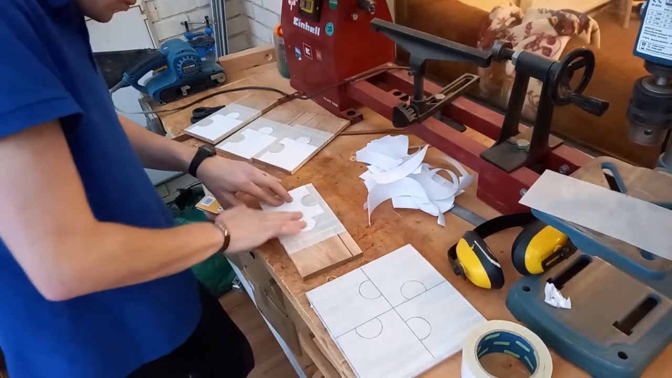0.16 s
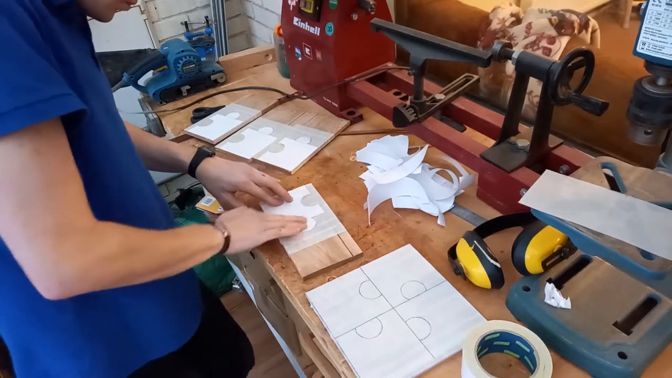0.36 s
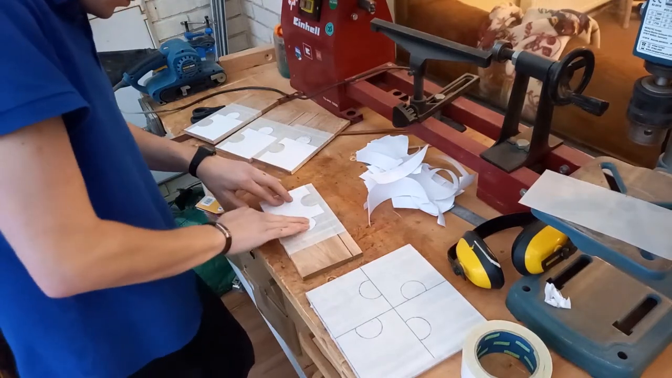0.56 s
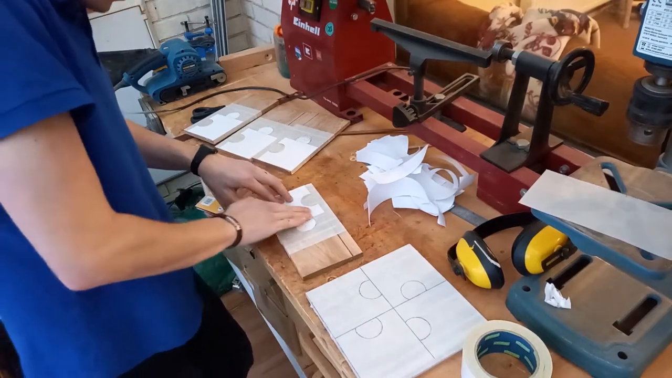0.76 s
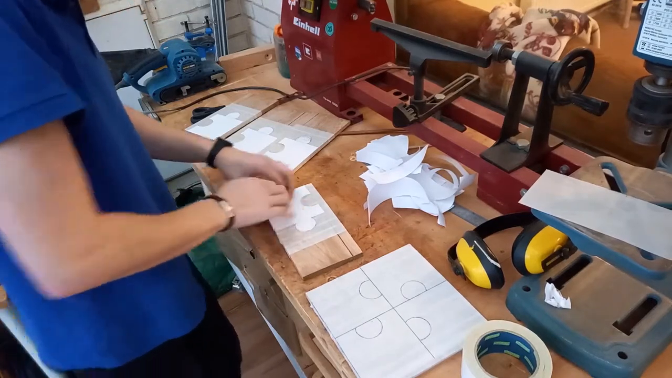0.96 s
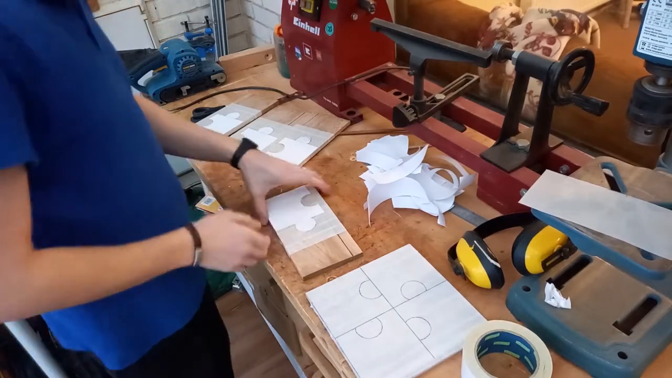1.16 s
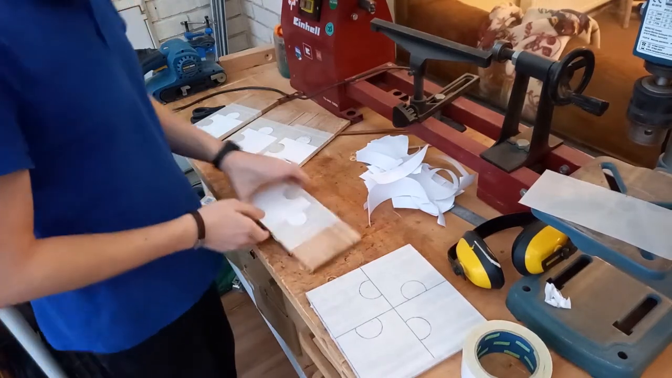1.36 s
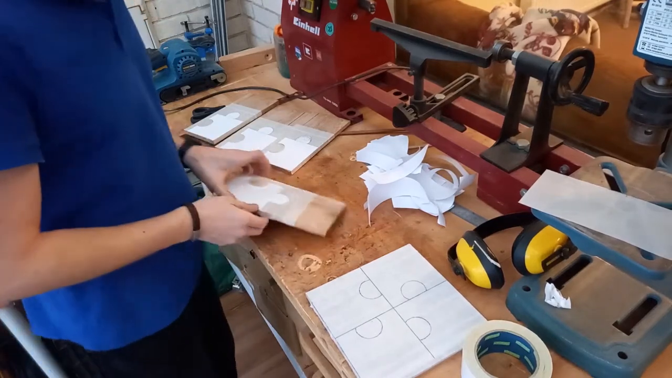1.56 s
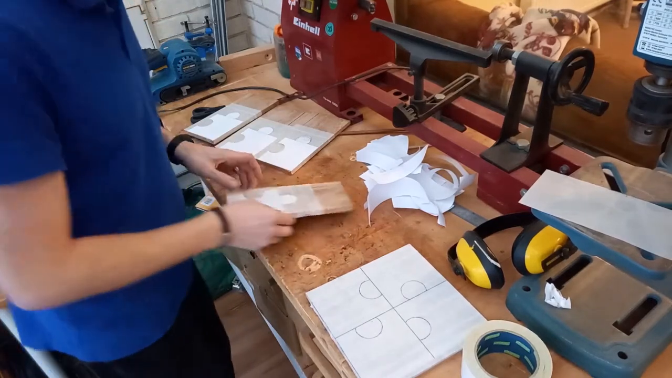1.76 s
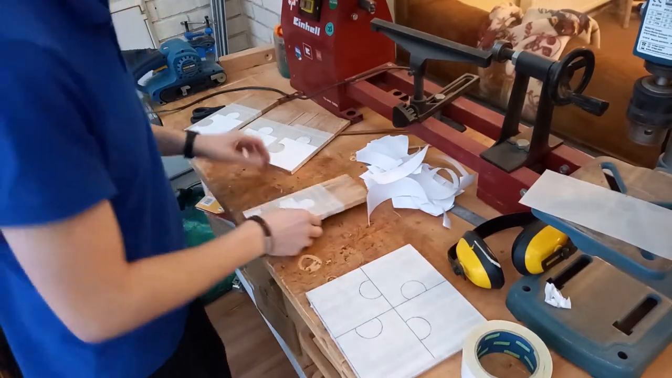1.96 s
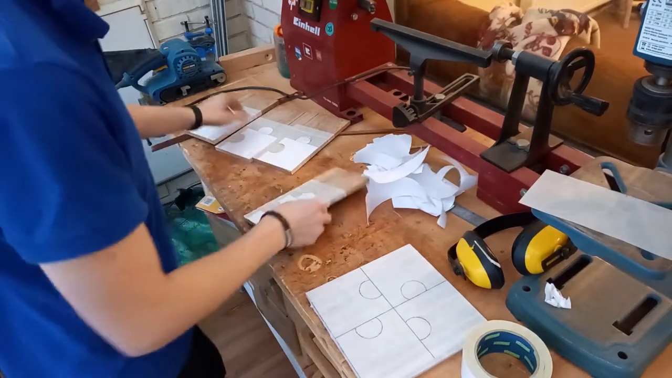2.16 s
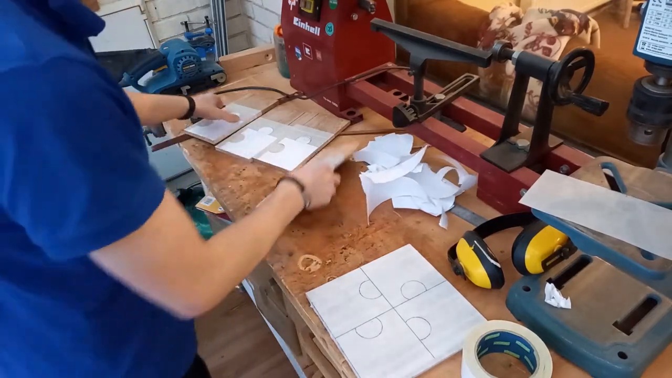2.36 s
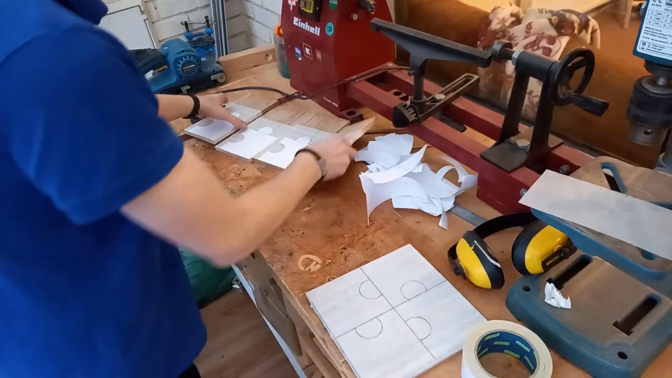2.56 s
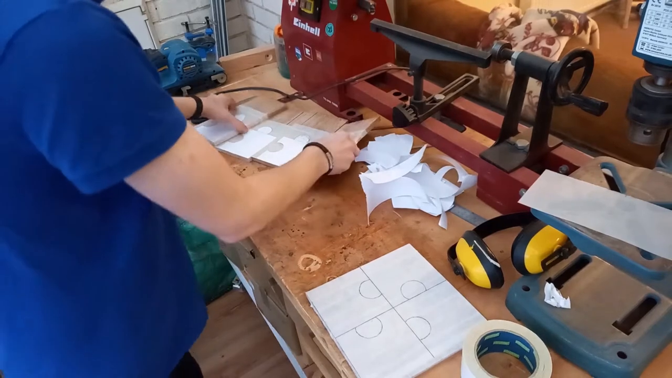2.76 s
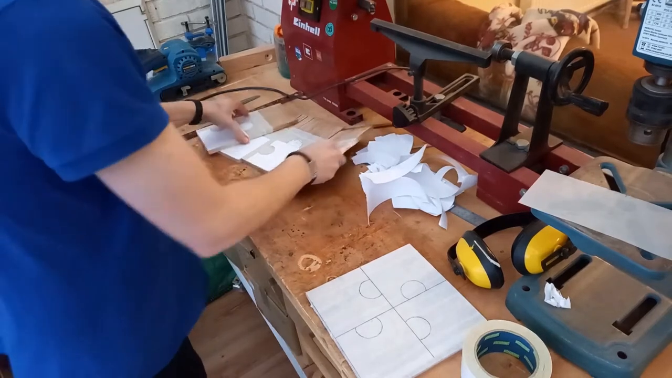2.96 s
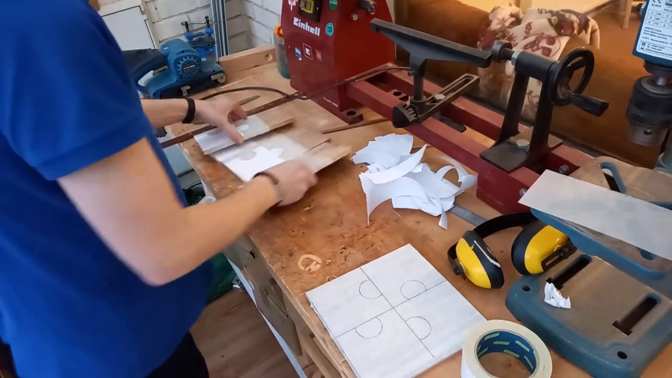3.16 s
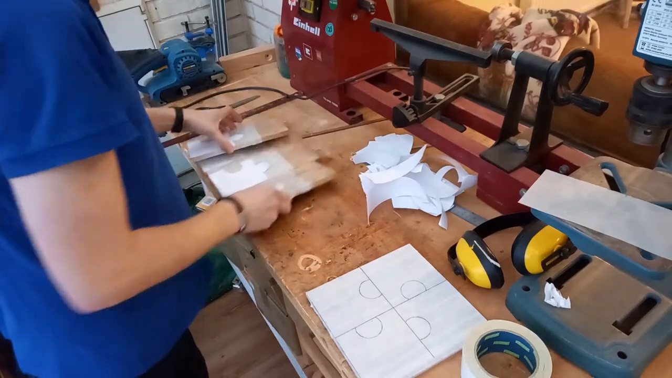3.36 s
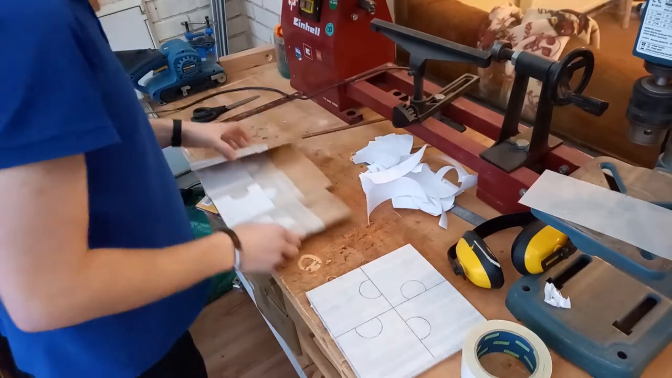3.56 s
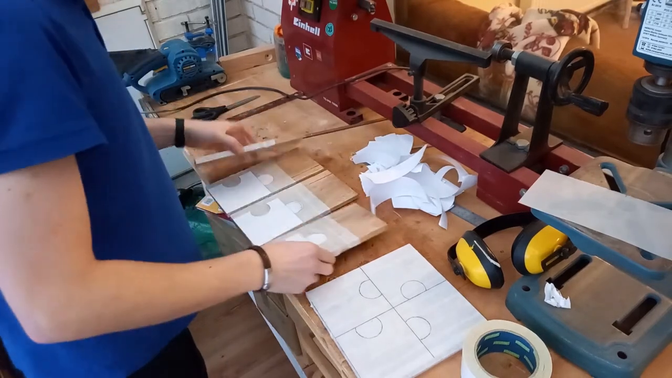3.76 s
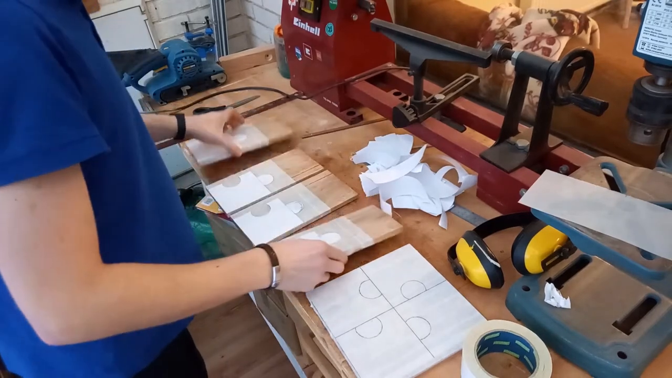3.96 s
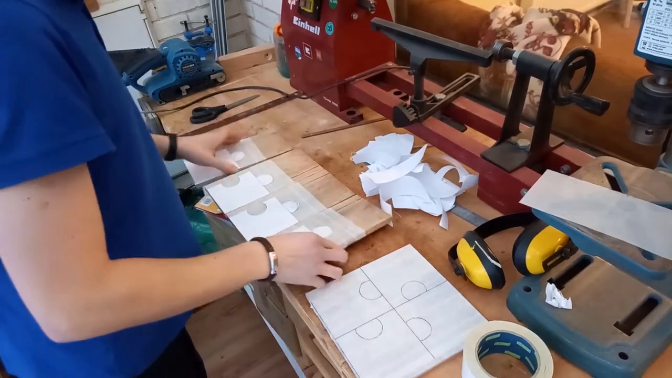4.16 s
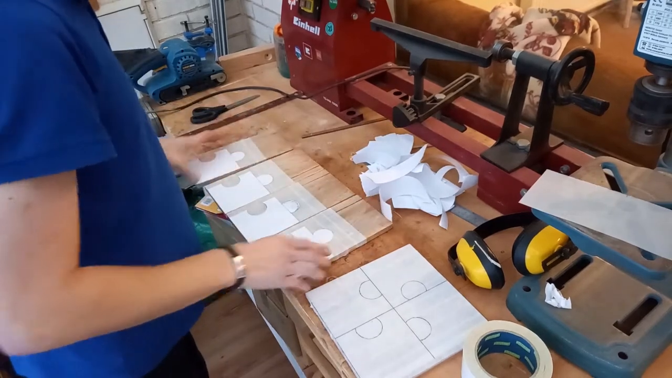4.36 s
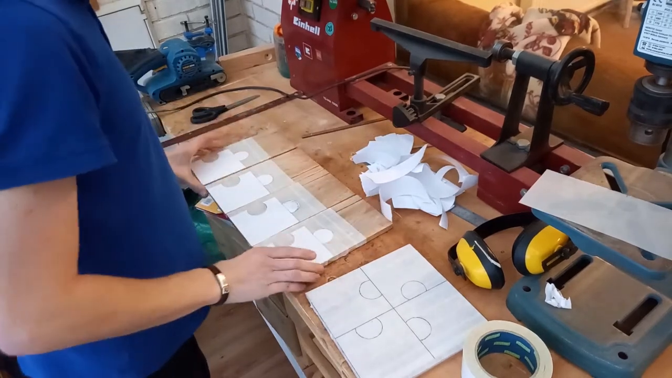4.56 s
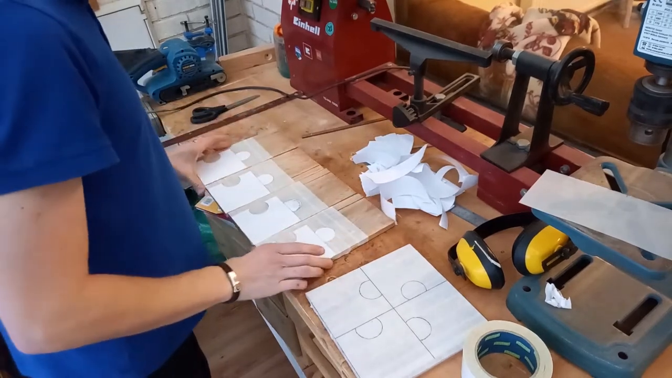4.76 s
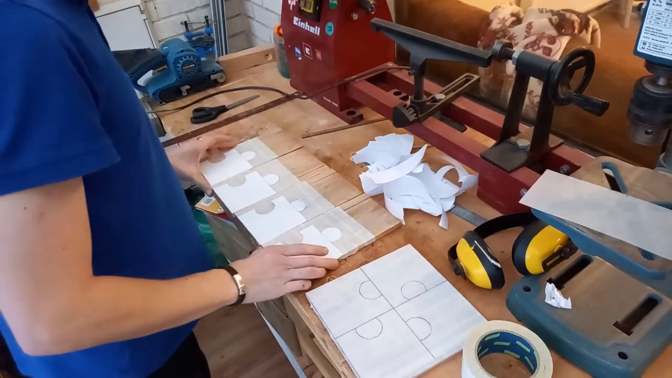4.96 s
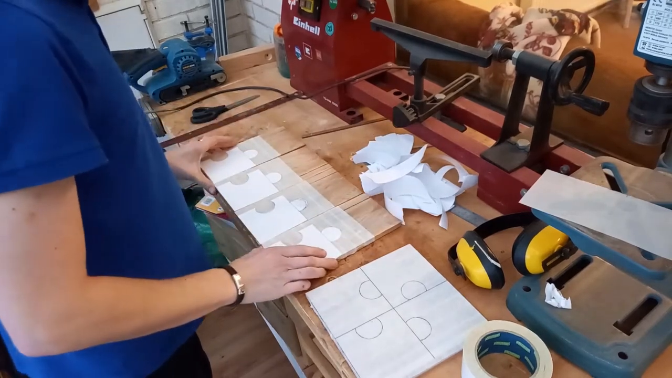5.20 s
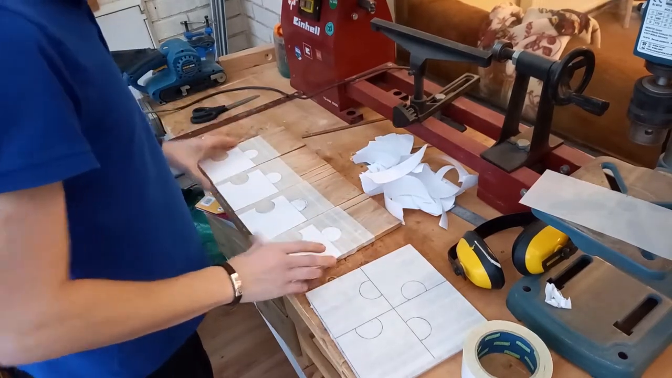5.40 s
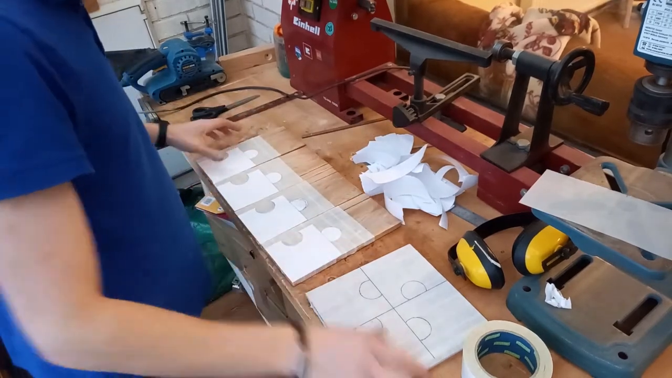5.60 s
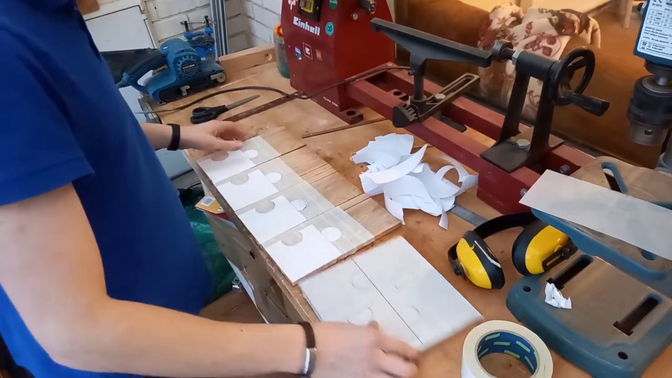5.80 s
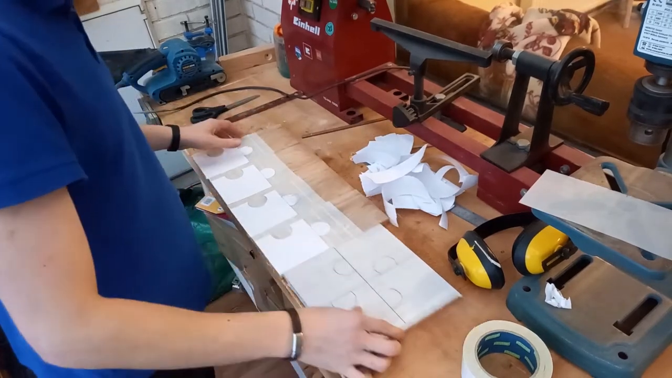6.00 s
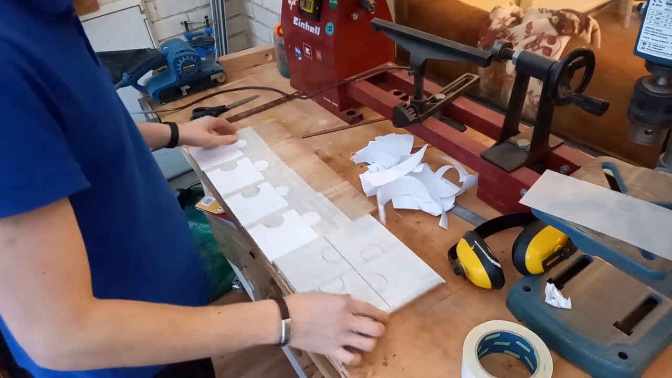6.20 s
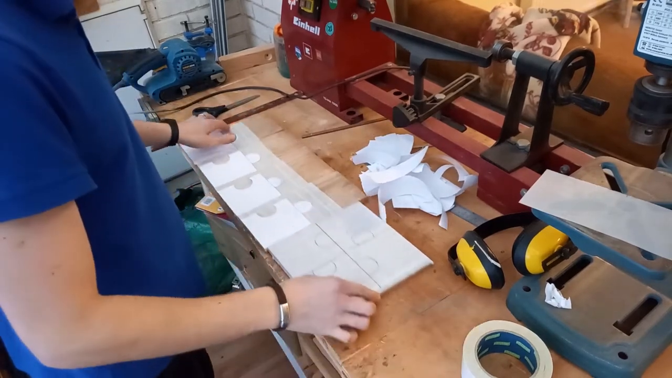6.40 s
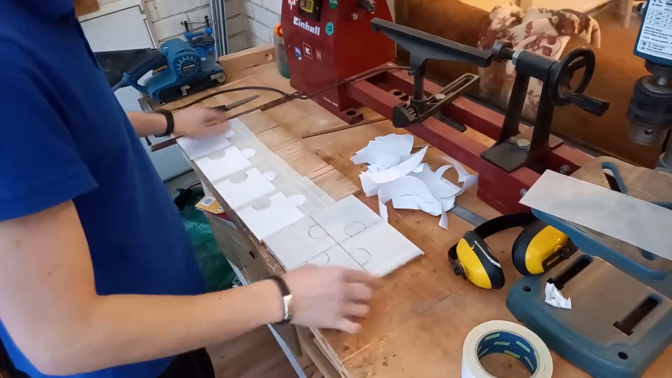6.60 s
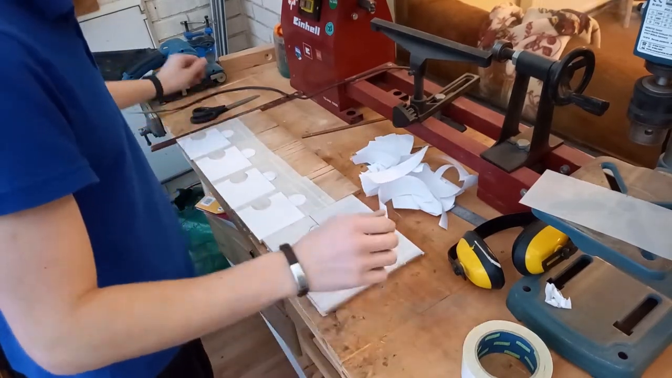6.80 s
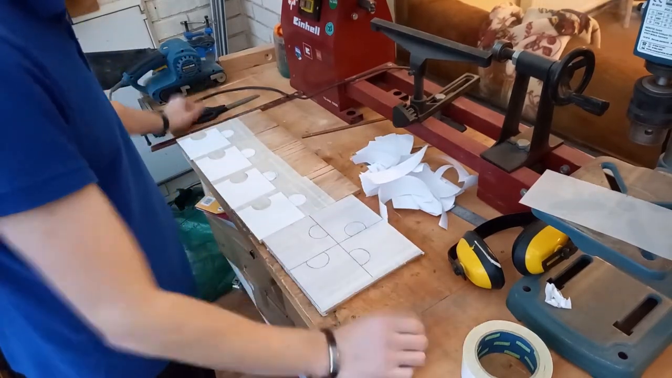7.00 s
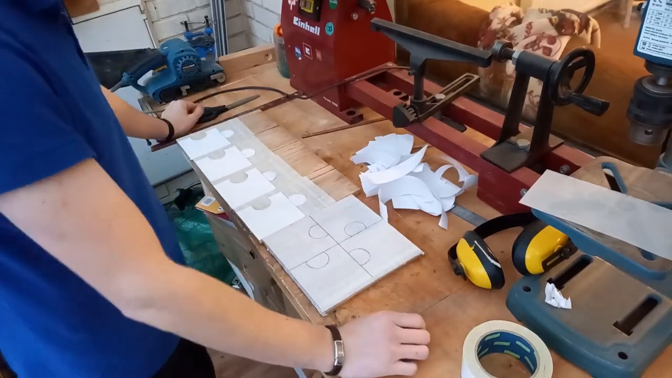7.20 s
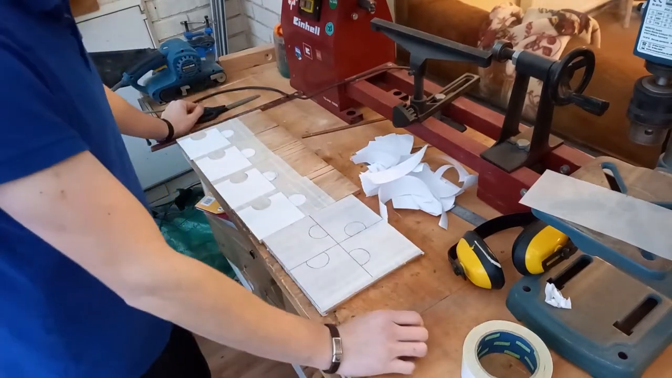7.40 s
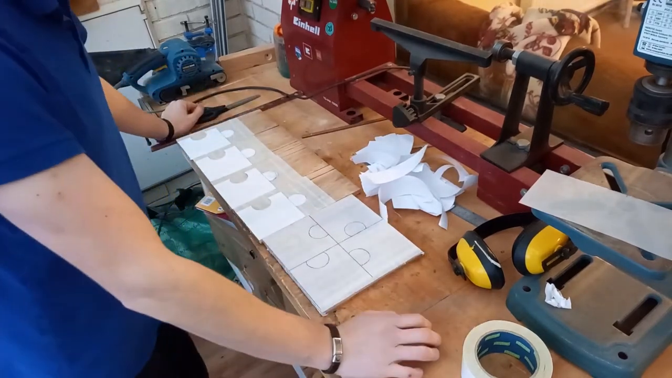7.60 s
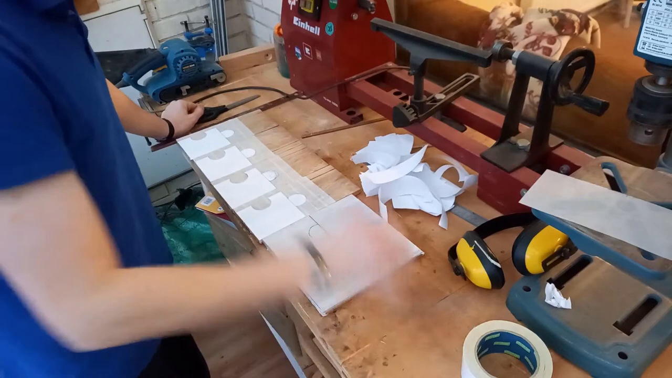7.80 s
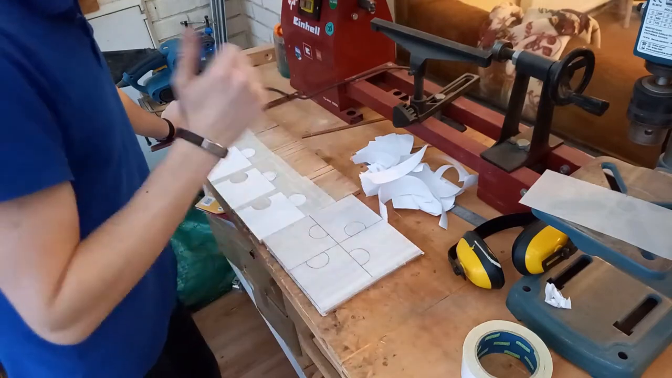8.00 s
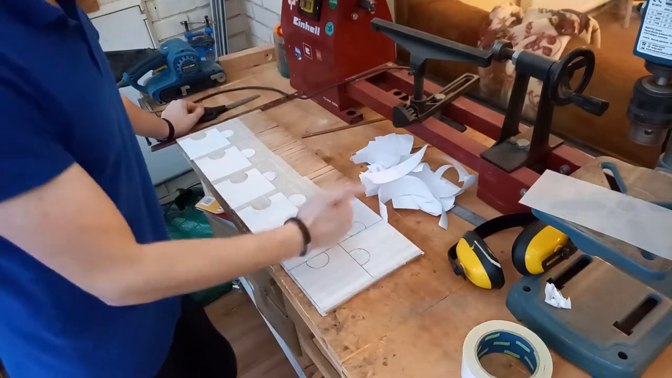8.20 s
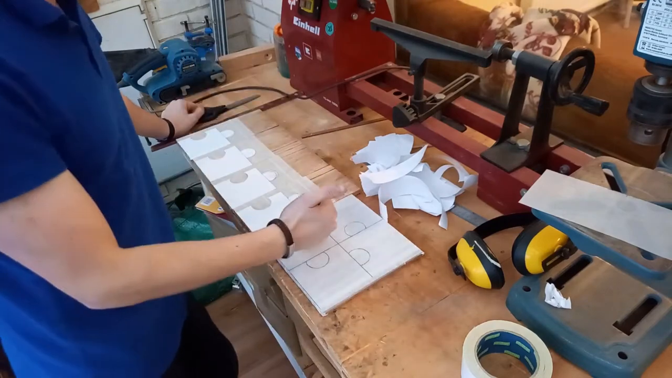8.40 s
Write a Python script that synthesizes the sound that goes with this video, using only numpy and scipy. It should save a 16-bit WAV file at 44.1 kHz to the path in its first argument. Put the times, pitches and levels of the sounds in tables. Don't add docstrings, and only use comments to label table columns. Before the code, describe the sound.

Close stereo sound at a wooden workbench in a small workshop, with a short room ring and faint hiss. From 0 to 1.2 s, very quiet fingers smooth paper with soft dry brushes and tiny taps. At 1.3-1.9 s a blank is lifted and tipped, giving scrapes, small clicks and thin woody ringing. A knock comes at 2.0, lighter contacts at 2.3 and 2.6, and a hollow broad bump around 2.8. From 3.1 to 3.8 two boards are pushed with a loud grainy scrape, ending in a clack at 3.7. Thuds at 4.06-4.15 lead to the loudest sharp clack at 4.23. Quiet small shifts follow until 5.6, the hiss dipping near 5.3. From 5.7 to 6.6 a wide board is drawn along with gritty friction and a low hum. Soft bumps sound at 7.0-7.1 and 7.6, then near silence and a faint paper brush at 8.3.

```python
import sys
import numpy as np
from scipy import signal
from scipy.io import wavfile
from scipy.ndimage import uniform_filter1d, map_coordinates

SR = 44100
rng = np.random.default_rng(int(sys.argv[2]) if len(sys.argv) > 2 else 0)


def file_out(sig):
    cols = np.atleast_2d(sig).T
    lim = np.clip(cols, -1, 1)
    pcm = np.round(lim * 32767).astype(np.int16)
    wavfile.write(sys.argv[1], SR, pcm)


def natural_amplitude(level_db):
    exponent = np.asarray(level_db, float) / 20
    return 10 ** exponent


N = 372644
EDGE_HZ = 15900


def evened(x):
    return x / np.sqrt(np.mean(x ** 2) + 1e-20)


def read(points, hz):
    f, value = np.transpose(points)
    return np.interp(np.log(hz + 1), np.log(f + 1), value)


def coloured(x, points):
    log_gain = np.log(natural_amplitude(read(points, abs(np.fft.fftfreq(4096, 1 / SR)))))
    spectrum = np.exp(log_gain - 1j * signal.hilbert(log_gain).imag)
    taps = np.fft.ifft(spectrum).real[:2048]
    return signal.oaconvolve(x, taps)[:len(x)]


def band(x, lo, hi):
    return signal.sosfilt(signal.butter(3, [lo, hi], "bandpass", fs=SR, output="sos"), x)


def ring(x, modes):
    out = np.zeros(len(x))
    for hz, width, db in modes:
        r = np.exp(-np.pi * 1.55 * width / SR)
        w = 2 * np.pi * hz / SR
        gain = (1 - r * r) / 2 * np.array([1, 0, -1])
        poles = [1, -2 * r * np.cos(w), r * r]
        once = signal.lfilter(gain, poles, x)
        out += natural_amplitude(db) * signal.lfilter(gain, poles, once)
    return out


def slow(make):
    t = np.arange(0, N + 32, 32) / SR
    return np.array([np.interp(np.arange(N) / SR, t, row) for row in make(t)])


FADE_DB, RISE_CURVE = 20, 1.6


def swell_db(t, peak, rise, fall, db):
    before = np.clip(peak - t, 0, None) / max(rise, .003)
    after = np.clip(t - peak, 0, None) / max(fall, .003)
    return db - FADE_DB * (before ** RISE_CURVE + after)


# f/Hz, likeness/0-1 (negative is opposed)
PORT_LIKENESS = [(40, 0.1), (120, 0.97), (300, 0.84), (640, 0.3), (1100, -.5), (2000, 0), (4000, .15),
                 (9000, 0.4), (15000, .7)]


def pair(shape):
    a, b, c, d = rng.standard_normal((shape[1], shape[0], 4)).T
    same = np.clip(read(PORT_LIKENESS, np.linspace(0, SR / 2, shape[0])), -1, 1)[:, None]
    left, other = a + 1j * b, c + 1j * d
    return np.array([left, same * left + np.sqrt(1 - same ** 2) * other])


# f/Hz, level/dB per Hz
HISS_SPECTRUM = [(20, -38), (45, -13), (70, -8.5), (130, -9.5), (300, -12.5), (800, -15), (1300, -19.5),
                 (2400, -27), (2800, -15.5), (3400, -13.5), (4100, -19), (4600, -24.5), (9000, -29),
                 (15800, -34.5)]
# t/s, level/dB
HISS_GATE = [
    (0, 7),
    (1.2, 6),
    (4.6, 1),
    (5.15, -7),
    (5.288, -12),
    (5.4, -2),
    (6.902, 1.5),
    (7.8, -1),
    (7.949, -1.5),
]
HISS_DB = -71


def hiss():
    frames, hz = N // 256 + 5, np.fft.rfftfreq(1024, 1 / SR)
    patches = uniform_filter1d(rng.standard_normal((frames, 513)).T, 10, 0)
    patches = evened(uniform_filter1d(patches, 8, 1))
    z = pair((513, frames)) * natural_amplitude(read(HISS_SPECTRUM, hz)[:, None] + 1.2 * patches)
    noise = evened(signal.istft(z, nperseg=1024, noverlap=768)[1][:, :N])
    s, db = np.transpose(HISS_GATE + [(8.12, 0)])
    return natural_amplitude(HISS_DB + np.interp(np.arange(N) / SR, s, db)) * noise


# t/s, peak level/dB
TICKS = [(0.0238, -49), (0.4334, -57), (0.616, -58), (0.9303, -54), (1.3404, -38), (1.4137, -38),
         (1.5838, -44), (1.8123, -43), (1.8552, -31), (2.1031, -51), (2.2877, -33), (2.5516, -55),
         (2.6155, -18), (3.7519, -39), (3.8018, -40), (3.8292, -45), (4.0103, -50), (4.0452, -47),
         (4.0592, -35), (4.1175, -38), (4.2343, -21), (4.4662, -56), (4.8135, -56), (4.8299, -44),
         (4.9137, -46), (5.4216, -53), (5.6256, -49), (5.8795, -24), (6.2003, -35), (6.2662, -39),
         (6.5246, -34), (7.007, -39), (7.0209, -33), (7.0888, -36), (7.6006, -53), (7.7328, -56)]
TICK_T60, TICK_LO_HZ, TICK_GAIN_DB = .005, 3200, 1


def ticks():
    out, t = np.zeros(N + 256), np.arange(256) / SR
    for (s, db), chance in zip(TICKS, rng.standard_normal((len(TICKS), 256))):
        crack = band(chance * natural_amplitude(-60 * t / TICK_T60), TICK_LO_HZ, EDGE_HZ)
        out[round(s * SR):][:256] += natural_amplitude(db + TICK_GAIN_DB) * crack / abs(crack).max()
    return out[:N]


def grit(per_s=4000, spread_db=3.5, judder_db=3.0, smooth=0.88, own=0.73):
    size = natural_amplitude(spread_db * np.minimum(rng.exponential(1, N), 4))
    catches = (rng.random(N) < per_s / SR) * size * rng.choice([-1, 1], N)
    slips = uniform_filter1d(rng.standard_normal((5, N // 16 + 1)), size=19)
    slips = uniform_filter1d(slips, size=19)
    mixed = (1 - own) * slips[0] + own * slips[1:]
    judder = evened(np.repeat(mixed, 16, axis=1)[:, :N])
    return evened((evened(catches) + smooth * rng.standard_normal(N)) * natural_amplitude(judder_db * judder))


GRIT_IN_UPPER, USUAL_GRIT_DB = 0.95, -14


def spread(db, grit_db, mix):
    bench, low, upper = mix
    upper_db = db + upper + GRIT_IN_UPPER * (grit_db - USUAL_GRIT_DB)
    return natural_amplitude(np.array([db + bench, db + low, upper_db, db + grit_db]))


def strokes(t, rows, mix):
    return sum(spread(swell_db(t, *row[:4]), row[4], mix) ** 2 for row in rows)


def slide(t, rows, mix):
    s, db, grit_db = np.transpose(rows)
    return spread(np.interp(t, s, db, -150, -150), np.interp(t, s, grit_db), mix) ** 2


# peak t/s, rise/s, fall/s, pressure level/dB, grit level/dB
RUBS = [(.034, 0.067, 0.076, -64.5, 5), (.122, 0.034, 0.11, -63, 0), (.28, 0.22, 0.47, -78, 9),
        (.47, 0.057, 0.099, -57.5, -6), (.64, 0.02, 0.18, -69.5, 11), (1.016, 0.14, 0.046, -59.5, -0.5),
        (1.11, 0.12, 0.1, -70, 11), (1.24, 0.13, 0.23, -52, -6), (1.865, 0.027, .1, -53, -14),
        (3.19, 0.016, 0.037, -60, 14), (6.74, 0.02, 0.058, -56, -6), (7.46, 0.088, 0.089, -66.5, -8.5),
        (7.75, 0.048, 0.039, -64, 2.5)]
# peak t/s, rise/s, fall/s, pressure level/dB, grit level/dB
LAST_BRUSH = (8.314, .08, .05, -76, 16)


def paper_rubs(t):
    return strokes(t, RUBS + [LAST_BRUSH], mix=(-0.56, -0.74, -10))


KNOCK_T60 = [.055, .03, .009, .006]
UPPER_DB, UPPER_PER_HARD, TICK_DB = -3.5, 0.3, -24


def blows(events, part, spike, rise_s):
    out, t = np.zeros(N + 4096), np.arange(4096) / SR
    rattle = rng.standard_normal((len(events), 4096))
    for (s, db, bench_db, hard_db), chance in zip(events, rattle):
        force = chance * natural_amplitude(-60 * t / KNOCK_T60[part]) * (1 - np.exp(-t / rise_s))
        force[0] += spike
        share_db = [bench_db, 0, UPPER_DB + UPPER_PER_HARD * hard_db, TICK_DB + hard_db][part]
        out[round(s * SR):][:4096] += natural_amplitude(db + share_db) * force
    return out[:N]


# t/s, force level/dB, bench top level/dB, hardness level/dB
KNOCKS = [(.099, -62, -11, 20), (1.416, -41, -22, 12), (1.586, -52.5, -40, -6), (1.974, -29.5, -11, -77),
          (2.289, -45, 2.5, 15.5), (2.552, -51.5, -3, -6), (2.615, -38, -12, 30), (2.8, -24, -11, -27),
          (3.188, -39, -11, 5), (3.728, -28, -7, -8), (4.061, -29, -10, -11), (4.2345, -16, -3, -6),
          (4.469, -66.5, -13, 26), (4.83, -65.5, 16.5, 26.5), (5.126, -65, -3, 19.5), (6.266, -43, -9, 16),
          (6.524, -48, 3, 23.5), (4.916, -52, 0, -10), (5.42, -79.5, 6.5, 33), (5.632, -52, 7.5, 15),
          (5.879, -61, 25, 18), (6.199, -52, 3, -10), (6.74, -89, -18.5, 6)]


def knocks(part):
    return blows(KNOCKS, part, spike=10.6, rise_s=0.00086)


# t/s, force level/dB, bench top level/dB, hardness level/dB
THUDS = [(.438, -65, 4, -8), (.616, -56.5, -3, -6), (1.152, -62.5, 14, 10), (1.32, -57, 10, 14),
         (1.702, -41, -16, -3), (1.814, -45, 2, 14), (1.844, -41, 2, 25), (3.912, -44, -3, -13),
         (4.011, -48, -3, 7), (4.075, -29.5, -4, 0), (4.119, -17, -4, -9.5), (4.145, -28, -16, -5),
         (4.243, -26, -9, -4), (6.556, -35, -16.5, -10.5), (7.004, -44, -2, 28), (7.022, -29, -2, -20),
         (7.084, -28, -6, 4.5), (7.548, -66, -4, -5), (7.609, -38.5, 1, -57.5), (7.667, -58.5, 6, 10),
         (7.744, -53, -11, 3)]


def thuds(part):
    return blows(THUDS, part, spike=0.17, rise_s=0.00027)


def sings(rows, width_hz=34, widens_from_hz=44000):
    out, t = np.zeros(N + 32768), np.arange(-8192, 24576) / SR
    for (s, rise, fall, db, hz), chance in zip(rows, rng.standard_normal((len(rows), len(t)))):
        tone = evened(ring(chance ** 3, [(hz, width_hz + hz ** 2 / widens_from_hz, 0)]))
        out[round((s + t[0]) * SR):][:len(t)] += tone * natural_amplitude(swell_db(t, 0, rise, fall, db))
    return out[:N]


# peak t/s, rise/s, fall/s, level/dB, f/Hz
BOOMS = [(.45, 0.018, 0.1, -68, 288), (.628, 0.013, 0.12, -57, 335), (1.165, .015, 0.11, -62.5, 342),
         (1.33, 0.032, 0.17, -49, 160), (1.47, .06, 0.057, -56, 161), (2.05, 0.059, 0.19, -47, 160),
         (2.21, 0.2, 0.12, -45.5, 353), (3.36, 0.067, 0.15, -39, 167), (4.07, 0.011, .06, -32.5, 194),
         (4.145, 0.046, .09, -27.5, 167), (4.09, 0.04, 0.071, -30.5, 990), (4.128, .008, 0.1, -30, 2170),
         (5.88, 0.076, 0.11, -39, 160), (6.3, 0.058, 0.15, -35.5, 255), (6.48, .08, 0.15, -39, 166),
         (7.095, 0.015, 0.12, -34, 175), (7.09, .012, 0.077, -31, 753)]


def booms():
    return sings(BOOMS)


# peak t/s, rise/s, fall/s, pressure level/dB, grit level/dB
FLAT = [(1.16, 0.067, 0.2, -51, -11.5), (1.3, 0.072, .08, -46, -12), (1.819, 0.015, 0.27, -44.5, -10),
        (2.4, 0.15, 0.13, -49.5, -10.5), (2.55, 0.032, 0.14, -40.5, -22), (2.75, 0.15, 0.34, -19.5, -27),
        (2.82, 0.11, 0.13, -31.5, -6), (3.038, 0.16, 0.91, -40, -9.5), (4.062, 0.088, 0.32, -28.5, -24),
        (4.41, 0.14, 0.041, -45, -39), (4.57, 0.14, 0.05, -44, -21), (4.758, 0.069, 0.4, -44.5, -25),
        (4.894, 0.16, 0.13, -36, -24), (5.062, .15, 0.19, -49, -20.5), (5.16, 0.1, 0.019, -64, -21),
        (5.458, 0.097, 0.039, -54.5, -18.5), (7.026, 0.02, 0.081, -34, -12.5),
        (7.17, 0.016, 0.17, -52, -33), (7.602, 0.012, 0.035, -29, -35.5), (7.63, 0.055, 0.2, -46.5, -18),
        (7.778, 0.12, 0.043, -56, -20)]


def flat_strokes(t):
    return strokes(t, FLAT, mix=(-3.5, -7.5, -5.5))


# peak t/s, rise/s, fall/s, level/dB
LEAN = [
    (1.27, .1, 0.09, -70),
    (4.379, 0.089, 0.04, -52.5),
    (6.7, 0.063, 0.1, -59),
    (7.04, 0.02, 0.15, -35.5),
    (7.65, 0.044, 0.099, -51.5),
]


def lean(press, follow_db=-24, apart=0.66):
    both, left, right = band(rng.standard_normal((3, N)), 51, 110)
    body_weight = slow(lambda t: [sum(natural_amplitude(swell_db(t, *row)) for row in LEAN)])[0]
    level = body_weight + natural_amplitude(follow_db) * uniform_filter1d(press[0], size=2048)
    return level * evened(both + apart * np.array([left, right]))


# from t/s, to t/s, ringing shares/0-1 of blank low, blank upper, pushed pair
HELD = [
    (1.267, 1.6, 0.66, 0.74, 0.33),
    (1.58, 1.975, 0.38, 0.2, 0.4),
    (2.02, 2.502, 0.64, 0.5, 0),
    (3.3, 3.736, 0.64, .1, 0.6),
    (3.76, 4.125, .7, 0.3, 0.6),
    (4.15, 4.448, 0.37, 0.05, 0.65),
    (6.696, 6.897, 0, 0.55, 0.52),
]
LYING, GRIP_S = (0.092, 0.017, 0.12), 0.25


def freedom(t):
    out = np.outer(LYING, np.ones(len(t)))
    for start, end, *shares in HELD:
        held = np.clip(np.minimum(t - start, end - t) / GRIP_S + .5, 0, 1)
        out = out + held * (np.array(shares) - LYING)[:, None]
    return np.clip(out, 0, 1)


# peak t/s, rise/s, fall/s, pressure level/dB, grit level/dB
TIPPED = [(1.28, 0.023, .1, -65, -11), (1.354, 0.058, 0.09, -30.5, -14), (1.46, 0.1, 0.045, -34, -13.5),
          (1.592, 0.014, 0.25, -57.5, -1), (1.8, 0.26, 0.029, -37, -22), (1.977, 0.0076, .15, -33.5, -29),
          (2.07, 0.16, 0.14, -35, -30), (2.2, 0.14, 0.19, -34.5, -16), (2.33, 0.019, 0.036, -41.5, -5.5),
          (2.614, 0.0072, 0.23, -28, -11), (3.924, 0.027, .05, -42, -30.5), (4.02, .05, .1, -50, -25),
          (4.18, .1, .05, -36, -21), (4.256, 0.047, 0.14, -44.5, -30.5), (5.634, 0.015, .05, -37.5, -15),
          (5.67, 0.063, 0.21, -39.5, -14), (7.011, 0.0095, 0.055, -22, -19),
          (7.092, 0.034, 0.064, -27, -18)]


def tipped_strokes(t):
    return strokes(t, TIPPED, mix=(-6, -0.47, -4))


# peak t/s, rise/s, fall/s, level/dB, f/Hz
SINGS = [(1.278, 0.024, 0.12, -49.5, 1850), (1.45, 0.11, 0.14, -40, 2130), (1.6, 0.014, 0.37, -47.5, 793),
         (1.588, .004, .05, -47.5, 2150), (1.822, .012, 0.05, -33.5, 290), (1.855, .02, 0.061, -41, 273),
         (1.977, 0.0041, 0.04, -32, 1180), (2.0, .03, .2, -49.5, 2150), (2.12, 0.017, .1, -51, 2100),
         (2.21, 0.13, 0.089, -47.5, 807), (2.28, .04, 0.053, -37.5, 290), (2.33, .03, 0.14, -60, 795),
         (2.67, 0.054, 0.13, -38, 1310), (2.78, 0.044, 0.16, -34, 946), (2.82, 0.026, 0.077, -32, 269),
         (3.31, 0.016, 0.087, -36, 3330), (3.345, .02, 0.092, -35, 848), (3.55, 0.17, 0.071, -33, 2440),
         (3.63, 0.044, 0.14, -28, 2220), (3.5, 0.044, 0.038, -46, 343), (3.6, 0.11, 0.022, -34, 350),
         (3.67, 0.031, 0.038, -35.5, 380), (3.916, 0.0037, 0.077, -43.5, 770),
         (4.035, 0.027, .06, -32.5, 750), (4.063, 0.0093, .04, -29.5, 1350), (4.066, 0.0056, .1, -33, 2630),
         (4.068, .008, .08, -41, 4000), (4.124, .006, .13, -41.5, 3920), (4.123, 0.0085, 0.13, -25.5, 953),
         (4.237, 0.0059, 0.032, -23.5, 1800), (4.55, 0.044, 0.14, -55.5, 360),
         (5.12, 0.09, 0.067, -56, 359.8), (4.03, .012, .05, -39, 800), (1.46, .05, .08, -41, 800),
         (6.72, 0.021, .06, -52, 2190), (6.745, 0.012, 0.05, -58, 3300), (7.018, 0.013, .09, -38, 751),
         (7.09, 0.0092, .06, -39, 3830), (7.61, 0.011, 0.04, -39, 684), (7.67, .006, 0.042, -39, 645)]


def blank_sings():
    return sings(SINGS)


# peak t/s, rise/s, fall/s, level/dB, f/Hz
THIN_SINGS = [
    (1.335, .025, .15, -44, 3980),
    (1.42, .008, .09, -41, 4000),
    (1.345, .008, 0.16, -46, 6040),
    (1.587, .003, .02, -52, 5300),
    (1.622, .004, 0.036, -50, 4050),
    (1.656, .004, .06, -52, 2140),
    (5.99, 0.15, 1.8, -41, 355.7),
    (6.585, .18, .07, -33, 360),
]


def thin_sings():
    return sings(THIN_SINGS, width_hz=14.5, widens_from_hz=110000)


# t/s, peak level/dB, centre f/Hz
SNAPS = [(1.586, -40, 5500), (1.855, -29, 13000), (2.289, -31, 4600), (3.19, -30, 13500),
         (3.728, -20, 3000), (4.234, -17, 4800), (4.47, -52, 5000), (5.634, -30, 3000), (5.66, -40, 3000),
         (5.879, -26, 5500), (6.2, -33, 4000), (6.52, -38, 8000), (1.812, -44, 5000), (1.341, -36, 4000),
         (4.061, -37, 7500), (7.6, -46, 6000), (7.55, -60, 1900)]
SNAP_T60, SNAP_OCTAVES = .01, .55


def snaps():
    out, t = np.zeros(N + 1024), np.arange(1024) / SR
    for (s, db, hz), chance in zip(SNAPS, rng.standard_normal((len(SNAPS), 1024))):
        lo, hi = hz / 2 ** SNAP_OCTAVES, min(hz * 2 ** SNAP_OCTAVES, SR / 2.5)
        burst = band(chance * natural_amplitude(-60 * t / SNAP_T60), lo, hi)
        out[round(s * SR):][:1024] += natural_amplitude(db) * burst / abs(burst).max()
    return out[:N]


# peak t/s, rise/s, fall/s, level/dB, f/Hz
RASPS = [
    (1.865, 0.017, 0.061, -42, 12600),
    (2.259, 0.082, .1, -58, 12400),
    (2.62, .008, 0.13, -41, 12300),
    (2.84, 0.094, 0.077, -41, 12500),
    (3.201, 0.044, .02, -36, 13300),
    (6.53, .01, 0.069, -61, 12000),
]


def paper_rasps():
    return sings(RASPS)


# t/s, pressure level/dB, grit level/dB
PUSH = [
    (3.08, -37.5, -20),
    (3.182, -26.5, -15),
    (3.214, -32.5, -12),
    (3.366, -25.5, -15.5),
    (3.554, -23, -15.5),
    (3.65, -23, -18.5),
    (3.752, -25, -31),
    (3.896, -49.5, -18.5),
    (3.916, -45, -18),
    (4.0, -61.5, -23),
]


def pair_pushed(t):
    return slide(t, PUSH, mix=(-4.5, -4, -5))


# peak t/s, rise/s, fall/s, level/dB, f/Hz
WIDE_SINGS = [(5.88, 0.11, 0.055, -41.5, 1510), (6.07, 0.099, 0.088, -40, 1200),
              (6.3, .15, 0.14, -39, 1190), (7.092, 0.018, 0.11, -36, 1900), (7.608, .006, .05, -35, 640),
              (5.636, .004, .08, -44, 2700), (4.122, .004, .09, -26, 1100), (4.126, .006, .07, -33, 400),
              (3.731, .004, .07, -30, 1100), (3.729, .003, .03, -30, 2900), (7.088, .006, .11, -32, 1120)]


def flat_board_sings():
    return sings(WIDE_SINGS, width_hz=150, widens_from_hz=12600)


# peak t/s, rise/s, fall/s, level/dB, f/Hz
BOARD_SINGS = [
    (3.731, 0.0037, 0.11, -40, 3916),
    (6.07, 0.12, 0.1, -52, 2330),
    (6.39, 0.091, 0.12, -36.5, 1007),
    (6.5, 0.14, 0.16, -54, 2370),
    (6.559, 0.0047, 0.043, -35.5, 1230),
]


def board_sings():
    return sings(BOARD_SINGS)


# t/s, pressure level/dB, grit level/dB
DRAW = [
    (5.69, -61, -11),
    (5.76, -37.5, -11),
    (5.876, -30, -16.5),
    (5.94, -33.5, -14.5),
    (6.096, -35, -14.5),
    (6.37, -32, -16.5),
    (6.59, -32.5, -20.5),
    (6.706, -83, -1),
    (6.78, -71, -7),
]


def board_drawn(t):
    return slide(t, DRAW, mix=(0.51, -0.87, -5))


def pressure(t):
    short = paper_rubs(t) + tipped_strokes(t) + flat_strokes(t)
    return np.sqrt(short + pair_pushed(t) + board_drawn(t))


# f/Hz, level/dB per Hz
WOOD = [(24, -62), (40, -43.5), (123, -2), (158, 0), (268, -15), (303, -0.5), (353, -4), (390, -11),
        (539, -16), (1200, -22), (1930, -24.5), (2360, -23), (8670, -37), (12300, -36), (15800, -43)]
# low f/Hz, high f/Hz
PART_BANDS = [(158, 530), (530, 1450), (1450, 5500), (5500, 16000)]


def body(forces, part, clear):
    probe = np.r_[1, np.zeros(4095)]

    def through(taps):
        return signal.oaconvolve(forces, taps[None] / np.linalg.norm(taps), axes=1)[:, :N]

    left = 1 - sum(share ** 2 for modes, share in clear)
    dense = through(band(coloured(probe, WOOD), *PART_BANDS[part]))
    out = np.sqrt(np.clip(left, .01, 1)) * dense
    return out + sum(share * through(ring(probe, modes)) for modes, share in clear)


# f/Hz, width/Hz, level/dB
BENCH = [(164.8, 11, 0), (232.5, 23, -2.5), (261.5, 32, -0.5), (344.8, 7, 1.5), (473.8, 32, -1.5)]
# f/Hz, width/Hz, level/dB
BENCH_STRUCK = [(160, 28, -2), (212.4, 60, 0.5), (265, 22, -5.5), (490, 180, -11)]
# f/Hz, width/Hz, level/dB
BENCH_HOLLOW = [(347.7, 39, 4.5), (288, 17, -5.5)]
# f/Hz, width/Hz, level/dB
BLANK_LOW = [(784.3, 62, 5), (890.5, 39, -3), (1098, 30, -6.5)]
# f/Hz, width/Hz, level/dB
BLANK_HIGH = [(2150, 83, 11), (1900, 55, -30), (3886, 91, 5.5), (6300, 110, -26.5)]
# f/Hz, width/Hz, level/dB
PAIR = [(2130, 382, 6.5), (2160, 140, -7.5), (2744, 970, -12), (3640, 280, -14.5)]


def wood(press):
    low, high, pair_share = slow(freedom)
    bench = [(BENCH, np.array([[.7], [.4]])),
             (BENCH_STRUCK, np.array([[.1], [.65]])),
             (BENCH_HOLLOW, np.array([0.34 + 0.54 * low, .05 + .5 * low]))]
    parts = [bench, [(BLANK_LOW, low)], [(BLANK_HIGH, high), (PAIR, pair_share)], []]
    force, out = grit(), 0
    for k, clear in enumerate(parts):
        hits = knocks(k) + thuds(k)
        out = out + body(np.array([press[k] * force[k], hits]), k, clear)
    return out


# t/s, delay/samples
LAG = [
    (0, 3.1),
    (3.499, 3.7),
    (4.062, 1.4),
    (4.229, 2.23),
    (5.65, 3),
    (5.88, 2.4),
    (6.2, 2.3),
]


def direct(x):
    s, lag = np.transpose(LAG)
    at = np.arange(N)
    return np.array([x, map_coordinates(x, [at - np.interp(at / SR, s, lag)], order=3)])


# f/Hz, T60/s
ROOM = [(100, 0.08), (300, 0.22), (700, 0.35), (1500, 0.37), (4000, 0.33), (10000, 0.32)]
# f/Hz, level/dB
WET = [(100, 0.5), (500, -0.5), (2000, 0), (5000, 1.5), (12000, 1.5)]


def workshop(x, gap_s=.005, build_s=0.00089, turns_per_s=2.3):
    hz, t = np.fft.rfftfreq(512, 1 / SR), np.arange(180) * 128 / SR
    t60, out = read(ROOM, hz)[:, None], 0
    shape = natural_amplitude(read(WET, hz)[:, None] - 60 * t / t60) / np.sqrt(t60)
    for k in range(3):
        tail = signal.istft(pair((257, 180)) * shape, nperseg=512, noverlap=384)[1]
        tail = tail * (1 - np.exp(-np.arange(tail.shape[1]) / (build_s * SR)))
        tail = np.pad(tail, ((0, 0), (round(gap_s * SR), 0)))
        tail = tail / np.linalg.norm(tail[0])
        window = np.sqrt(2 / 3) * np.cos(np.pi * (turns_per_s * np.arange(N) / SR + k / 3))
        out = out + signal.oaconvolve((window * x)[None], tail, axes=1)[:, :N]
    return out


def scene():
    press = slow(pressure)
    scrape, knock = wood(press)
    bright = snaps() + blank_sings() + thin_sings() + paper_rasps() + flat_board_sings() + board_sings()
    near = direct(natural_amplitude(-6.5) * scrape + natural_amplitude(4.5) * knock + bright)
    close = direct(booms() + ticks())
    room = workshop(natural_amplitude(-3.5) * scrape + natural_amplitude(11.0) * knock + natural_amplitude(-7.0) * bright)
    return near + room + lean(press) + hiss() + close


def top_cut(x):
    return signal.sosfilt(signal.butter(12, 16450, fs=SR, output="sos"), x)


def record(dry, cut_hz=35):
    cut = signal.sosfilt(signal.butter(2, cut_hz, "highpass", fs=SR, output="sos"), dry)
    edge = signal.firwin(301, EDGE_HZ, window=("kaiser", 8), fs=SR)
    mix = signal.oaconvolve(cut, edge[None], "same")
    return top_cut(mix)


dry = scene()
out = record(dry)
file_out(out)
```